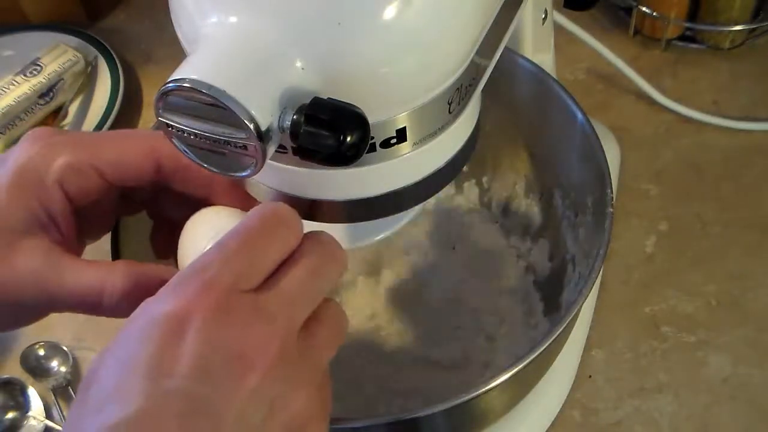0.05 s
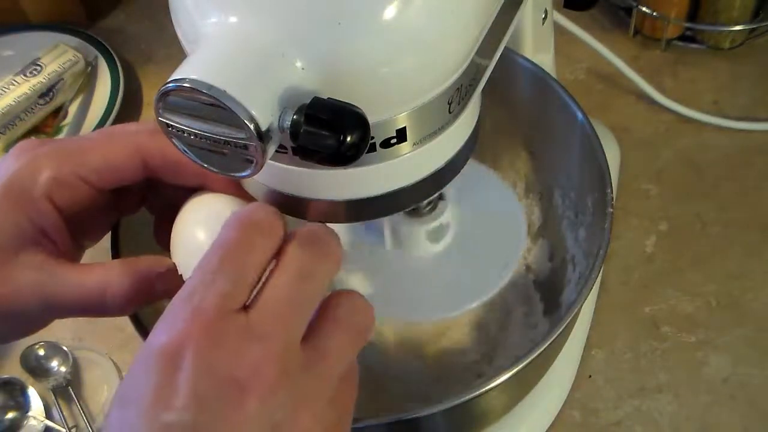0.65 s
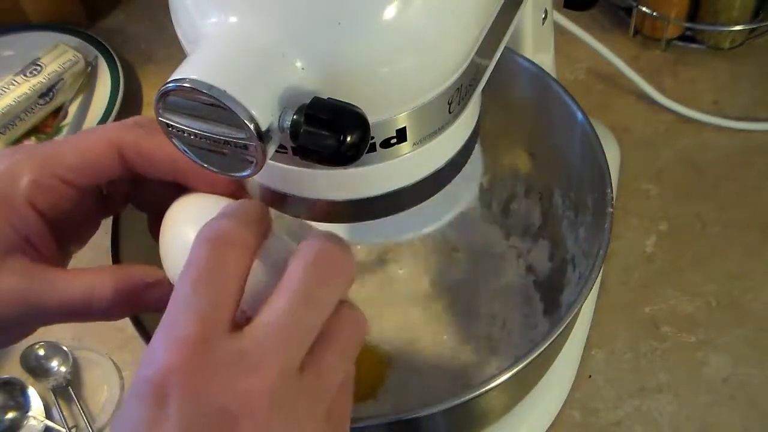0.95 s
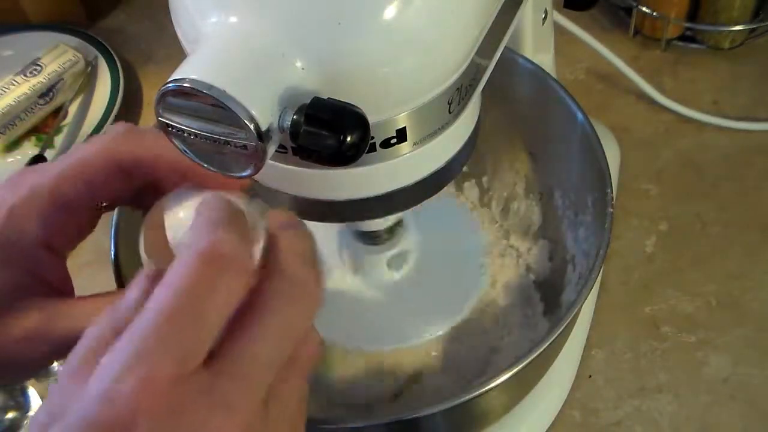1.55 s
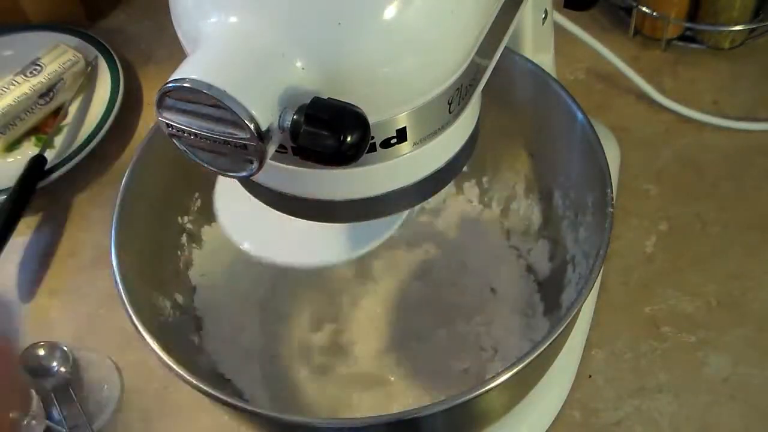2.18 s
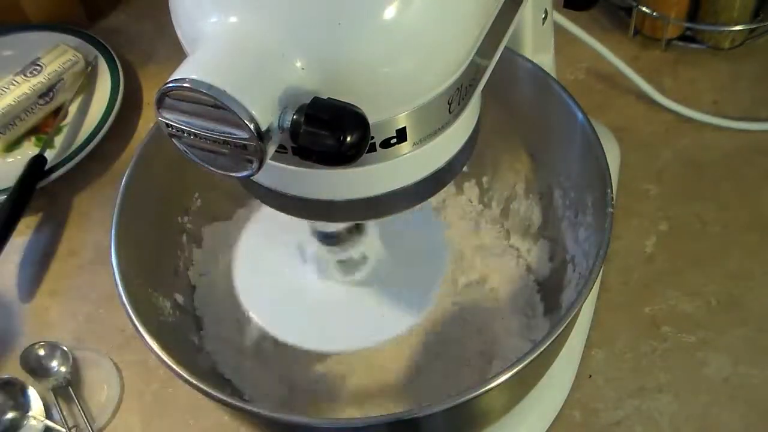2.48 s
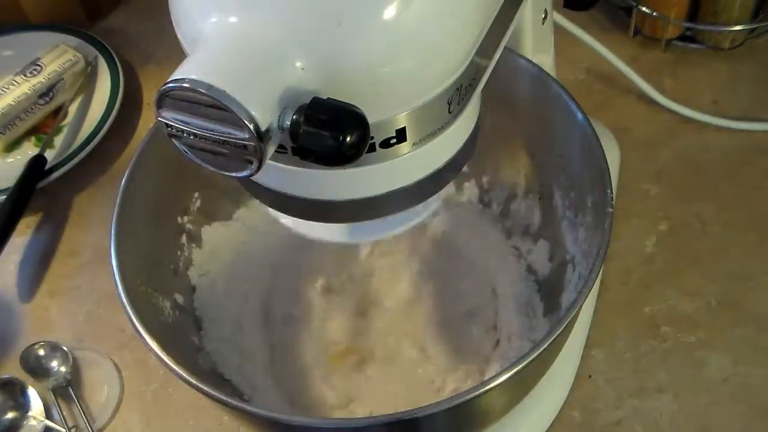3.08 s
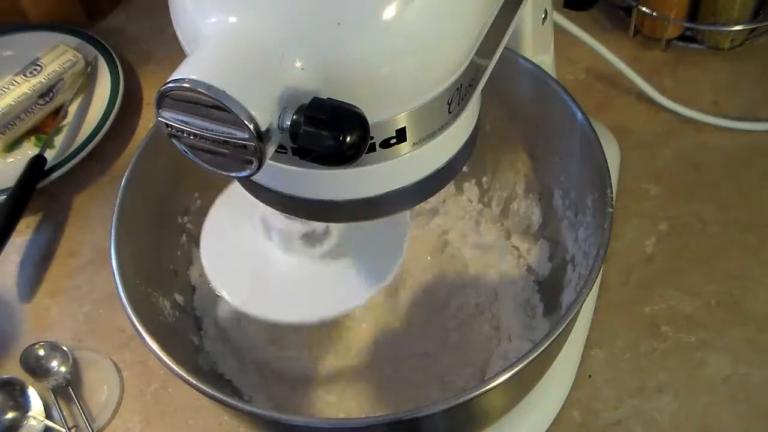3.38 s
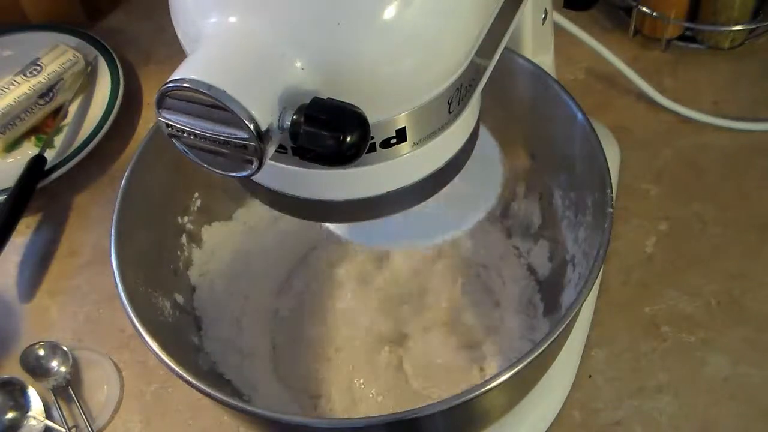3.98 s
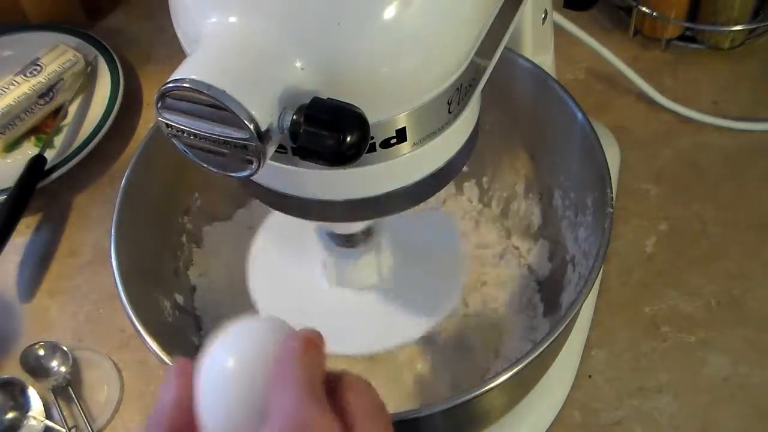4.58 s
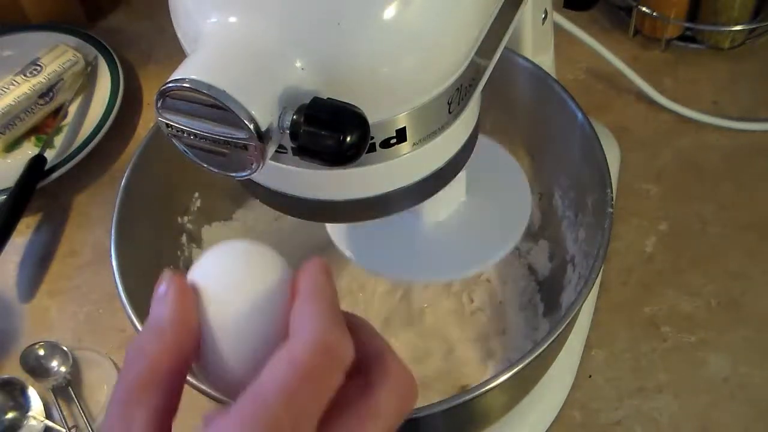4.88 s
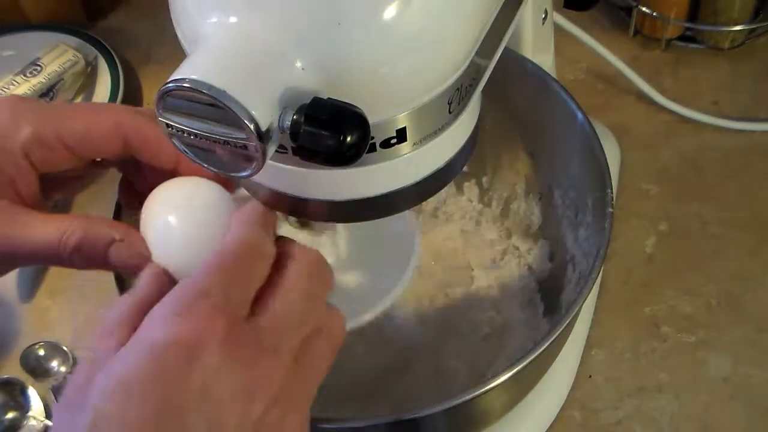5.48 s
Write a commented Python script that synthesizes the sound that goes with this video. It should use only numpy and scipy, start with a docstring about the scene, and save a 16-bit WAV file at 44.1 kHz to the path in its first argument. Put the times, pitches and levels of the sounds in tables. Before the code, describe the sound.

Close to the microphone in a home kitchen, a stand mixer works dough with a steady, buzzing gear whine, rattle and hiss. Over it, an eggshell splits crisply and its halves click together. A little later the shell crumples and lands with a light clack. Finally, two sharp knocks of another egg make the metal bowl ring, and the overall volume dips for a moment after the hardest blows.

```python
"""A stand mixer runs at low speed over a steel bowl of dough, close by in a small kitchen. From start
to end its gears whine and rattle, pulsing with the mains power, and its motor brushes hiss.
In the first second and a half an egg is pulled open. From about 2.5 to 3 seconds the empty shell is
crushed and dropped. Near 4.7 seconds a second egg is knocked twice on the rim, and the bowl rings.
An automatic volume control turns everything down briefly after the sharpest blows."""
import sys
import numpy as np
from scipy import signal
from scipy.fft import rfft, irfft
from scipy.io import wavfile
from scipy.ndimage import uniform_filter1d, minimum_filter1d

SR = 44100
rng = np.random.default_rng(int(sys.argv[2]) if len(sys.argv) > 2 else 0)


def waveform_to_disk(signal):
    """Save audio, clipped to [-1, 1], as 16-bit WAV at the path in sys.argv[1]."""
    frames = np.transpose(np.atleast_2d(signal))
    scaled = np.clip(frames, -1, 1) * 32767
    samples = np.round(scaled).astype(np.int16)
    wavfile.write(sys.argv[1], SR, samples)


N = 253134
TIME = np.arange(N) / SR
FREQ = np.maximum(np.fft.rfftfreq(N, 1 / SR), 1)
SHAFT_HZ, MAINS_PULSE_HZ = 46.03, 120  # turns and pushes of the motor each second


def whine(clock, waver_db=1.65, hum_waver_db=3.0, slip_radians=0.46, level_db=-0.1, ear_radians=0.051):
    """Gear and motor tones follow the speed; each swells and slips as the teeth take up the load."""
    # The low hum of the motor and the stand. Each row: pitch in Hz, level in dB.
    hum = [(34, -59), (59, -57.5), (120, -53), (166, -62.5), (242, -56.5), (285, -54)]
    case_load = 1 + 0.12 * walk(20)  # the gear case booms unevenly as the dough drags
    tones = [(hz, db + boom_db * case_load + waver_db * walk(24), start)
             for hz, db, boom_db, start in gear_tones()]
    tones += [(hz, db + hum_waver_db * walk(14), rng.random()) for hz, db in hum]
    out = 0
    for hz, db, start in tones:
        phase = 2 * np.pi * (hz * clock + start) + slip_radians * walk(25)
        ear_shift = ear_radians * rng.choice((-1, 1)) * np.array([[1], [-1]])  # one ear hears it sooner
        out = out + undb(db) * np.sin(phase + ear_shift)
    return np.sqrt(2) * undb(level_db) * out


def gear_tones(lag_cycles=0.15):
    """Meeting teeth make tones, and the mains pulses add side tones in steps of the pulse rate."""
    # The meeting gear teeth. Each row: pitch as a multiple of the shaft rate, level in dB,
    # lowest step, highest step. Multiples and steps get rounded to whole numbers.
    meshes = [(10, -55, 0, 0), (20, -57.5, -2, 2), (21, -54.5, -1, 3), (22, -51, -3, 3), (23, -52.5, -4, 1),
              (24, -53.5, -3, -3), (32, -53.5, 0, 0), (33, -54, 0, 0), (35, -58, 0, 0), (38, -57, 0, 0),
              (40, -52, 0, 0), (43, -59, 0, 0), (44, -52, 0, 1), (57, -56, 0, 0), (60, -55, 0, 0),
              (62.6, -52.5, 0, 0), (66, -53, 0, 0.5)]
    # The dB added to the middle tone, then to the side tones one to four steps away.
    step_db = [0.5, -4, 2.5, -1.5, 1.5]
    # Where the gear case booms. Each row: pitch in Hz, width in Hz, boost in dB.
    gear_case = [(652, 54, 11), (1230, 48, 4)]
    tones = []
    lags = lag_cycles * rng.standard_normal(2 * len(step_db))  # shared, so all gears buzz together
    for multiple, db, lowest, highest in meshes:
        start = rng.random()  # starting point of the wave, in cycles
        for step in range(round(lowest), round(highest) + 1):
            hz = round(multiple) * SHAFT_HZ + step * MAINS_PULSE_HZ
            boom_db = sum(boost / (1 + (2 * (hz - centre) / width) ** 2)
                          for centre, width, boost in gear_case)
            tones.append((hz, db + step_db[abs(step)], boom_db, start + lags[step]))
    return tones


def grind(clock, level_db=-37.5, slack_turns=0.0014, harmonic_count=240, points=8192):
    """The slightly loose worm gear rubs over the same rough spots on every turn."""
    # The tone of the grinding. Each row: frequency in Hz, level in dB.
    grind_colour = [(30, -21), (200, -19), (330, 0.5), (520, -5), (800, 1.5), (1400, -2.5), (2000, -4),
                    (2350, -7), (3000, -3.5), (4500, -7), (5400, -10.5), (6000, -3.5), (7200, 0),
                    (11000, -10)]
    shape = (2, harmonic_count)
    harmonics = np.exp(2j * np.pi * rng.random(shape)) * rng.rayleigh(size=shape)
    roughness = irfft(harmonics, points)  # one full turn
    turns = SHAFT_HZ * clock + slack_turns * walk(35)
    place = (turns * points).astype(int) % points
    rubbing = roughness[:, place] * torque(clock)
    return undb(level_db) * radiate(rubbing, colour(grind_colour) * housing())


def rattle(clock, level_db=-37.0, clatter_db=1.04, swell_db=1.0):
    """Loose gear teeth clatter, hardest on each push of the motor."""
    # The tone of the rattle. Each row: frequency in Hz, level in dB.
    rattle_colour = [(22, 1), (40, 0), (85, -3), (180, -5.5), (290, 1), (440, -0.5), (520, -4), (660, 3.5),
                     (880, 2), (1080, -5), (1300, -2), (1680, -7), (1810, 0), (2350, -18), (4000, -40)]
    strength = torque(clock) * undb(clatter_db * walk(260) + swell_db * walk(22.63))
    return undb(level_db) * noise(colour(rattle_colour), strength)


def brushes(clock, level_db=-36.0, scrape_db=-0.5, flicker_db=1.0, spot_count=36):
    """The motor's brushes hiss, louder at the same spots of every turn, and ring the housing."""
    # The tone of the hiss. Each row: frequency in Hz, level in dB.
    hiss_colour = [(1200, -3), (2400, 6), (3000, 9.5), (3650, 2), (4050, 6.5), (4500, -8.5), (5050, 7.5),
                   (5400, -20), (5750, 11.5), (6250, 1), (7100, 7), (8200, 4), (9600, 2.5), (11000, -8)]
    spots = unit(rng.standard_normal(spot_count))
    scrape = np.interp(SHAFT_HZ * clock, np.arange(spot_count) / spot_count, spots, period=1)
    strength = undb(scrape_db * scrape + flicker_db * walk(45))
    return undb(level_db) * noise(colour(hiss_colour) * housing(), strength)


def housing():
    """The motor housing boosts the frequencies at which it likes to ring."""
    # Where the housing rings. Each row: pitch in Hz, width in Hz, boost in dB.
    rings = [(2902, 30, 7), (3040, 60, 6), (3435, 40, 4), (4050, 70, 4), (5000, 160, 3), (6100, 60, 4),
             (6460, 70, 9), (6560, 50, 3), (6865, 90, 4), (7070, 50, 4), (7380, 60, 3), (7695, 50, 7),
             (8850, 80, 4), (10370, 70, 5), (10800, 100, 5)]
    return 1 + sum((undb(db) - 1) * np.abs(resonance(hz, width)) ** 2 for hz, width, db in rings)


def torque(clock, depth=0.067, sharpness=5.8):
    """The motor pushes in short pulses, one on each half wave of the mains power."""
    pulse = np.exp(sharpness * np.cos(2 * np.pi * MAINS_PULSE_HZ * clock))
    return 1 + depth * unit(pulse - pulse.mean())


def motor_clock(wander=0.00109, flutter=0.001089):
    """Time as the motor counts it: its speed wavers a little."""
    return np.cumsum(1 + wander * walk(4) + flutter * walk(30)) / SR


def eggshell(grain_db=2, crack_width_ratio=3.2):
    """The shell cracks brightly and its hollow halves clack; crumpling is a swarm of tiny breaks."""
    # The shell splits. Each row: start in seconds, level in dB, pitch in Hz, fade time in seconds.
    cracks = [(.1395, -18.5, 1500, 0.063), (.5382, -16, 3800, 0.045), (0.5656, -3, 7440, 0.046),
              (.5753, -8, 7000, 0.035), (.6085, -14, 4200, 0.031), (.892, -20, 1900, 0.048),
              (1.3815, -20, 3400, .03), (4.723, -4, 5500, .03), (4.862, -6.5, 5870, 0.076)]
    # Hollow pieces clack. Each row: start in seconds, level in dB, pitch in Hz, width in Hz,
    # fade time in seconds.
    clacks = [(.5382, -13.5, 2820, 900, 0.07), (.5465, -18, 2770, 700, .03), (.5565, -24, 2850, 600, .02),
              (.5665, -16, 3600, 1600, .03), (.5735, -16, 2720, 550, 0.052), (.5765, -17, 4600, 700, 0.09),
              (1.1175, -20, 1700, 800, 0.066), (1.1835, -21, 1960, 450, 0.04),
              (1.1893, -12.5, 1800, 910, 0.09), (1.1935, -23, 1750, 700, .06),
              (1.207, -25, 2100, 1200, .04), (1.2725, -21, 1580, 400, 0.091), (1.287, -17, 1570, 550, 0.03),
              (1.2955, -17.5, 1640, 700, 0.037), (1.374, -22.5, 1500, 500, 0.033),
              (1.3815, -13, 1650, 900, 0.057), (2.8003, -19, 1480, 600, 0.06),
              (2.8302, -34, 1510, 400, .04), (2.8656, -25, 1540, 250, .04),
              (2.8906, -22.5, 1550, 350, 0.058), (2.9438, -9.5, 2020, 1270, 0.037),
              (2.9456, -13, 2000, 1240, 0.062), (2.949, -21, 3260, 1200, 0.059),
              (2.9575, -14.5, 2240, 1100, 0.097), (4.862, -14.5, 2350, 1800, 0.023),
              (4.866, -15.5, 4900, 900, 0.11)]
    # Fingers crumple the shell. Each row: loudest moment in seconds, length in seconds, level in dB,
    # pitch in Hz, width in Hz.
    crunches = [(0.12, 0.044, -33.5, 820, 500), (0.546, 0.012, -32, 4000, 3000),
                (0.53, 0.004, -25.5, 6300, 11000), (0.582, 0.018, -32, 4400, 700),
                (0.62, 0.05, -35, 2800, 3900), (2.871, 0.014, -25, 7900, 5300),
                (2.892, 0.017, -24, 4400, 26000), (2.5, 0.036, -35, 3500, 1100),
                (2.875, 0.053, -31, 1520, 70), (2.85, 0.069, -36, 447, 33), (2.835, 0.037, -40, 340, 98),
                (2.865, 0.074, -35, 950, 900)]
    wide_cracks = [(start, db, hz, crack_width_ratio * hz, fade_s) for start, db, hz, fade_s in cracks]
    out = snaps(wide_cracks, crumble_db=-8.5, spread_s=0.00027)
    out += snaps(clacks, crumble_db=-8.0, spread_s=0.00025)
    fractures = undb(grain_db * walk(600))
    for middle, length, db, hz, width in crunches:
        swell = np.exp(-2 * ((TIME - middle) / length) ** 2)
        out += undb(db) * swell * noise(resonance(hz, width), fractures)
    return out


def snaps(events, crumble_db, spread_s):
    """Each snap rings a piece of shell for a few cycles and crumbles away."""
    out = np.zeros((2, N))
    delay_s = spread_s * np.exp(-FREQ / 7000)  # high notes travel faster through the bending shell
    smear = np.exp(-2j * np.pi * np.cumsum(delay_s) * SR / N)
    for start, db, hz, width_hz, fade_s in events:
        piece = resonance(hz, width_hz) ** 2  # applied twice for a steeper filter
        snap = irfft(piece * smear, N) / np.abs(irfft(piece, N)).max()
        crumble = undb(crumble_db) * fade(fade_s) * noise(piece)
        add(out, start, undb(db) * (snap + crumble))
    return out


def knock(push_db=-12, ring_db=-20.5, crack_db=-10, scatter_db=-17, thump_hz=100):
    """An egg cracks on the rim; the bowl rings, the stand thumps, counter and walls scatter the blow."""
    # The egg hits the bowl. Each row: start in seconds, blow level in dB, thump level in dB.
    hits = [(4.7141, 2.5, -21.5), (4.862, -12.5, -25.5)]
    # The tone of the contact. Each row: frequency in Hz, level in dB.
    contact_colour = [(40, -20), (200, -12), (450, -1), (650, 3), (950, 2), (1300, -1), (1750, -4),
                      (2100, -6), (3200, 0), (4700, 0), (6000, -6), (7500, -6), (11000, -16)]
    # The bowl's notes, the low ones cut short by the dough.
    # Each row: pitch in Hz, level in dB, fade time in seconds.
    bowl_notes = [(440, 2.5, .09), (690, 5, .04), (850, 5, .05), (1020, 2, .05), (1093, 0, .16),
                  (1254, 2, .12), (1776, -5, .18), (2810, -3, .16), (3327, -6, .15), (3898, -4, .11),
                  (4177, -8, .25), (4441, -4, .09), (4797, -5, .13), (5631, -5, .12)]
    contact = colour(contact_colour)
    # Make a click of that tone, with its energy packed right after the touch.
    cepstrum = irfft(np.log(contact), N)
    push = irfft(np.exp(rfft(2 * cepstrum[:N // 2], N)), N)
    # Neighbouring notes swing in opposite directions.
    ring = sum((-1) ** k * undb(db) * fade(fade_s) * np.sin(2 * np.pi * hz * TIME)
               for k, (hz, db, fade_s) in enumerate(bowl_notes))
    tail = undb(crack_db) * fade(seconds=0.017) + undb(scatter_db) * fade(seconds=0.24)
    blow = undb(push_db) * push / np.abs(push).max() + undb(ring_db) * ring + tail * noise(contact)
    thump = fade(seconds=0.25) * np.sin(2 * np.pi * thump_hz * TIME)
    out = np.zeros((2, N))
    for start, blow_db, thump_db in hits:
        add(out, start, undb(blow_db) * blow + undb(thump_db) * thump)
    return out


def radiate(pair, response):
    """Filter two signals into left and right: low notes are much alike in both ears, highs are wide."""
    # Stereo width. Each row: frequency in Hz, level in dB of what differs between the ears (side)
    # against what they share (mid).
    stereo_width = [(30, -12), (120, -8.5), (280, -20.5), (480, -46), (700, -16), (1300, -34),
                    (2500, -16.5), (4500, -5.5), (7000, -4.5), (11000, -2.5)]
    mid, side = rfft(pair) * response
    side = side * colour(stereo_width)
    return unit(irfft(np.array([mid + side, mid - side]), N))


def noise(response, envelope=1):
    """Stereo noise, shaped in loudness and then filtered."""
    return radiate(rng.standard_normal((2, N)) * envelope, response)


def colour(points):
    """A filter that joins up (Hz, dB) points into a gain at every frequency."""
    hz, db = np.transpose(points)
    return undb(np.interp(np.log(FREQ), np.log(hz), db))


def resonance(hz, width_hz):
    """A filter that rings at one pitch, with a gain of 1 there."""
    return 1 / (1 + 1j * (FREQ ** 2 - hz ** 2) / (FREQ * width_hz))


def walk(rate):
    """A random wobble of size about 1 that heads for a new value `rate` times a second."""
    steps = rng.standard_normal(int(N / SR * rate) + 4)
    return unit(np.interp(TIME * rate + rng.random(), np.arange(len(steps)), steps))


def fade(seconds):
    """Die away by 60 dB in the given time."""
    return np.exp(-np.minimum(np.log(1000) * TIME / seconds, 60))


def add(out, start_s, sound):
    """Mix a sound in from its start time on."""
    start = int(start_s * SR)
    out[:, start:] += sound[..., :N - start]


def undb(db):
    """Turn decibels into a gain."""
    return 10 ** (np.asarray(db) / 20)


def unit(x):
    """Scale a signal to an average size (rms) of 1."""
    return x / np.sqrt(np.mean(x ** 2))


def duck(x, limit_db, hold_s, release_db_per_s):
    """How many dB to turn down: the amount over a limit, held for a while and then let go."""
    power = uniform_filter1d(np.mean(x ** 2, axis=0), size=89, origin=44)  # over the last 2 ms
    excess_db = np.maximum(10 * np.log10(np.maximum(power, 1e-12)) - limit_db, 0)
    half = int(hold_s * SR / 2)
    held_db = -minimum_filter1d(-excess_db, 2 * half + 1, origin=half)
    release_db = release_db_per_s * TIME
    return np.maximum.accumulate(held_db + release_db) - release_db


def scene(mixer_db=0.74, drag_db=0.07, drag_peak_s=0.93, orbit_s=1.15):
    """The mixer works the dough while the eggs are handled above the bowl."""
    # The beater circles the bowl and is a touch louder each time it meets the thick of the dough.
    load_db = mixer_db + drag_db * np.cos(2 * np.pi * (TIME - drag_peak_s) / orbit_s)
    clock = motor_clock()
    mixer = whine(clock) + grind(clock) + rattle(clock) + brushes(clock)
    return undb(load_db) * mixer + eggshell() + knock()


def record(dry, limit_db=-18.5, top_hz=10850):
    """The volume dips briefly after a bright click, longer after a heavy blow; the top highs are cut."""
    body = signal.sosfilt(signal.butter(2, 2800, fs=SR, output="sos"), dry)
    quick_db = duck(dry, limit_db, hold_s=0.03, release_db_per_s=31.5)
    slow_db = duck(body, limit_db, hold_s=0.44, release_db_per_s=57)
    ducked = dry * undb(-np.maximum(quick_db, slow_db))
    rounded = np.tanh(ducked)  # softens the peaks
    return signal.sosfilt(signal.ellip(10, .2, 70, top_hz, fs=SR, output="sos"), rounded)


dry = scene()
out = record(dry)
waveform_to_disk(out)
```